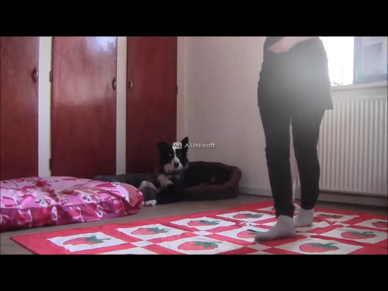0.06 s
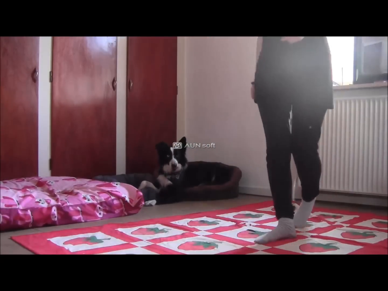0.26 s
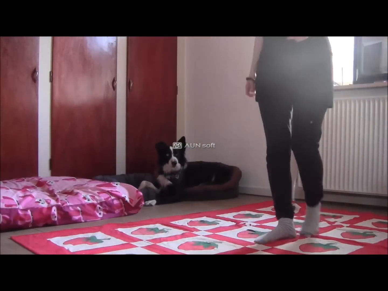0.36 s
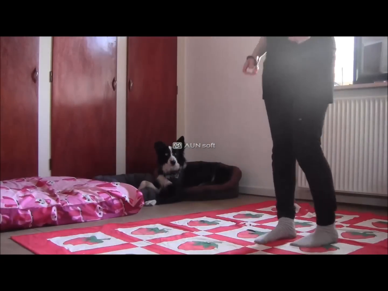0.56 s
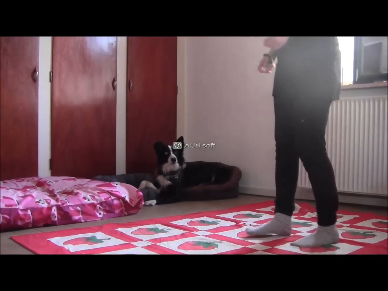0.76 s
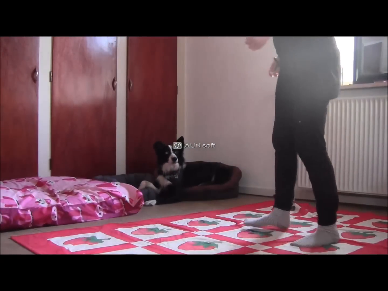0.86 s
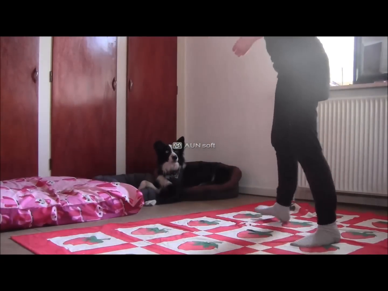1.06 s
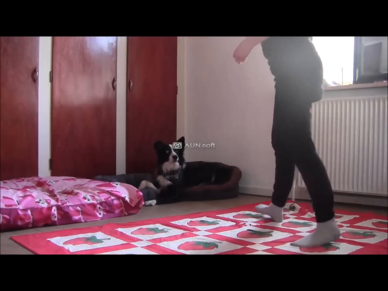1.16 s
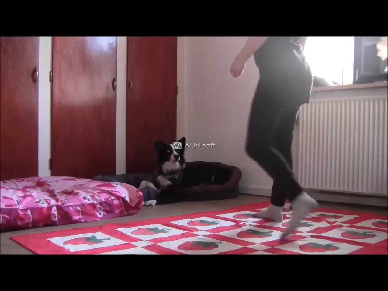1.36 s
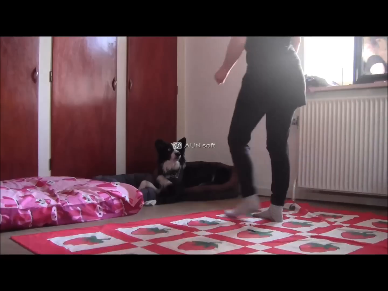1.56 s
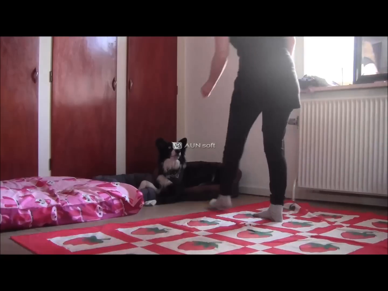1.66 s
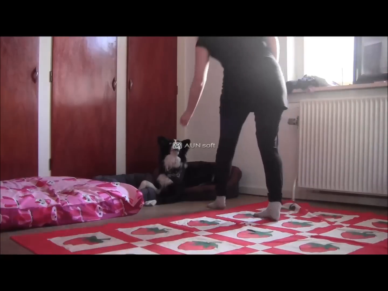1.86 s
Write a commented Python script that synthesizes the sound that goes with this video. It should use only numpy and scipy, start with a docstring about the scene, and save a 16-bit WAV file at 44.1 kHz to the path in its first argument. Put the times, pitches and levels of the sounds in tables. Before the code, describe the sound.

A dog training clicker snaps twice in quick succession, bright and then lower, echoing briefly in a small room. Soft steps in socks and one heel knock follow, with faint clothes rustle and quiet room noise.

```python
"""Dog clicker in a small room

A training clicker is pressed and let go: its steel tongue snaps twice, bright then lower.
The trainer steps about in socks on a play mat, clothes rustling; one heel knocks on the floor.
Hard, near walls throw strong echoes at a closely spaced microphone pair. A limiter holds the peaks,
and quiet room noise lies underneath."""
import sys
import numpy as np
from scipy import signal
from scipy.fft import rfft, irfft
from scipy.io import wavfile
from scipy.ndimage import uniform_filter1d, minimum_filter1d

SR = 44100
rng = np.random.default_rng(int(sys.argv[2]) if len(sys.argv) > 2 else 0)


def master_out(mix):
    """Clip the mix to full scale and print it as 16-bit PCM to the path in sys.argv[1]."""
    frames = np.transpose(np.atleast_2d(mix))
    ceiling = np.clip(frames, -1, 1)
    pcm = np.round(ceiling * 32767).astype(np.int16)
    wavfile.write(sys.argv[1], SR, pcm)


N = 83790
T = np.arange(N) / SR
HZ = np.fft.rfftfreq(2 * N, 1 / SR)

# stereo width of room noise and rustle: frequency_hz, side_to_mid_db
AMBIENT_WIDTH = [(80, -15.5), (210, -7.5), (420, -0.5), (900, 0), (1800, -3.5), (6500, -4.5), (12000, -1)]


def clicker():
    """The steel tongue snaps as it is bent, then rings lower as it springs back."""
    # levels of each snap: ring_db, crack_db, echo_db, tail_db, chatter_db
    press_levels = (24.5, -2, 5, 5, -3.5)
    release_levels = (28, -1.5, 2, 6, 8)
    # modes of the tongue, bent and free: pitch_hz, width_hz, level_db
    bent_modes = [(1250, 330, -21.5), (1805, 520, -5), (2330, 480, -7), (2920, 340, -2), (3473, 490, 1),
                  (4050, 290, -25.5), (6574, 760, -7.5), (9880, 4100, -21)]
    free_modes = [(1050, 480, -26), (1440, 600, -14), (1860, 303, 2.5), (2086, 337, -3), (2377, 600, -15.5),
                  (3730, 730, -20), (4180, 470, -19.5), (5894, 1600, -29), (8300, 1200, -34.5),
                  (9966, 500, -26.5)]
    press = snap(press_levels, bent_modes, start_s=.2279)
    release = snap(release_levels, free_modes, start_s=.3781)
    return press + release


def snap(levels, modes, start_s):
    """The tongue buckles with a crack; its modes swell in the case and die within milliseconds."""
    # spectrum of the crack: frequency_hz, level_db
    crack_spectrum = [(100, -34.5), (450, -24.5), (800, -12.5), (1500, 8.5), (4000, 3), (5300, -6),
                      (10500, -16), (13000, -17), (16000, -19.5)]
    # stereo width of the snap's reverberation: frequency_hz, side_to_mid_db
    snap_width = [(500, -15), (1000, -13), (2000, -17.5), (3500, -12.5), (7000, -8), (12000, -4)]
    ring_db, crack_db, echo_db, tail_db, chatter_db = levels
    tongue = sum((-1) ** k * amp(db) * band(hz, width) ** 2 for k, (hz, width, db) in enumerate(modes))
    case = high_pass(hz=605, order=2)  # the small case radiates little bass
    crack = pulse(crack_spectrum)
    source = amp(ring_db) * tongue * case + amp(crack_db) * crack
    # the tongue chatters for about 1 ms as it lands, beamed straight at the microphones
    chatter = rng.standard_normal(N) * np.exp(-T / .001)
    chatter = shape(chatter / np.linalg.norm(chatter), delay(start_s) * crack)
    return room(delay(start_s) * source, echo_db, tail_db, snap_width) + amp(chatter_db) * chatter


def feet(heel_s=1.3298):
    """One hard heel knock and several soft, scuffing footfalls ring the same floor."""
    # modes of the floor: pitch_hz, width_hz, level_db
    floor_modes = [(238, 30, 8), (289, 54, 0.5), (375, 78, -6.5), (513, 40, 5), (640.6, 12, -4.5),
                   (770, 70, -17.5), (918, 80, -15), (1150, 150, -11), (1560, 260, -11)]
    # contact noise of a foot: frequency_hz, level_db
    knock_spectrum = [(40, -6), (130, -3), (600, -5), (1400, -8.5), (2300, 6), (2900, 4), (3600, -5),
                      (4400, -31.5), (6200, -27), (10000, -47), (16000, -75)]
    # levels of the heel, then of the room for all steps: ring_db, knock_db, echo_db, tail_db
    levels = (11, -4.5, -3.5, 4)
    # soft footfalls: start_s, level_db, contact_s, scuff_db, treble_cut_hz
    footfalls = [(.03, -8.5, .012, -21, 260), (.56, -6.5, 0.0073, -26, 266), (.605, -6.5, 0.0093, -6, 1583),
                 (1.04, -9, .01, -31.5, 260), (1.482, -10.5, .003, -12, 1180),
                 (1.876, -18.5, 0.0082, -24, 800)]
    # stereo width of the steps' reverberation: frequency_hz, side_to_mid_db
    step_width = [(100, -21.5), (250, -29.5), (450, -22.5), (900, -17), (3500, -15), (7000, -4)]
    ring_db, knock_db, echo_db, tail_db = levels
    floor = ring(floor_modes) * low_pass(hz=2120, order=5)
    knock = pulse(knock_spectrum)
    steps = delay(heel_s) * (amp(ring_db) * floor + amp(knock_db) * knock)
    for start_s, level_db, contact_s, scuff_db, treble_cut_hz in footfalls:
        push = rng.standard_normal(N) * T * np.exp(-T / contact_s)
        soft_push = rfft(push / np.linalg.norm(push), 2 * N) * low_pass(treble_cut_hz, order=2)
        steps += delay(start_s) * amp(level_db) * soft_push * (floor + amp(scuff_db) * knock)
    return room(steps, echo_db, tail_db, step_width)


def clothes():
    """Clothes and socks rub: a swish of noise swells and fades with each move."""
    # swishes: peak_s, half_length_s, level_db
    swishes = [(.02, 0.026, -60), (0.135, 0.12, -59.5), (0.595, 0.15, -55), (0.854, 0.12, -62.5),
               (1.204, 0.045, -65.5), (1.366, 0.058, -58.5), (1.46, 0.052, -61.5), (1.89, 0.057, -73)]
    # colour of rubbing cloth: frequency_hz, relative_db
    cloth_spectrum = [(100, -6.5), (500, 11.5), (1200, 4.5), (3000, 5.5), (6000, 0.5), (9500, -7),
                      (13000, -24), (16000, -34)]
    movement = sum(amp(db) * np.exp(-2 * ((T - peak_s) / half_s) ** 2) for peak_s, half_s, db in swishes)
    return noise(cloth_spectrum) * movement


def bumps():
    """Faint, deep bumps sound under the clicks."""
    # low bumps: start_s, relative_db
    hits = [(.236, 3.5), (0.32, 0), (0.373, -3)]
    impulses = sum(amp(db) * delay(start_s) for start_s, db in hits)
    return amp(9.5) * irfft(band(hz=60, width_hz=70) ** 2 * impulses)[:N]


def room(source, echo_db, tail_db, stereo_width, build_s=.0064):
    """A source spectrum reaches the pair as direct sound, echoes and a tail longest in the midrange."""
    # reverberation time: frequency_hz, t60_s
    decay_times = [(100, 0.17), (300, 0.19), (800, 0.56), (1900, .49), (3500, 0.42), (7000, 0.28),
                   (11000, 0.3), (15000, 0.095)]
    wash = rfft(diffuse(stereo_width), 2 * N)
    tail = 0
    for centre_hz, t60_s in decay_times:
        share = curve([(hz, hz == centre_hz) for hz, _ in decay_times])  # crossfades between bands
        tail += irfft(wash * share)[:, :N] * np.exp(-np.log(1000) * T / t60_s)
    tail = tail * (1 - np.exp(-T / build_s)) / np.sqrt(SR * .033)
    response = 1 + amp(echo_db) * echoes(stereo_width) + amp(tail_db) * rfft(tail, 2 * N)
    return irfft(source * response)[:, :N]


def echoes(stereo_width, scatter_s=.0009, scatter_db=.5):
    """Each near reflection is part mirrored, part smeared by furniture, and loses some treble."""
    # reflections off floor, ceiling and walls: delay_s, relative_db
    reflections = [(.0045, -3), (.0068, -11.5), (.0101, 0.5), (0.0108, -2.5), (0.0156, 0), (0.0133, -9.5)]
    mirrored = sum(amp(db) * delay(delay_s) for delay_s, db in reflections)
    burst_power = sum(amp(db) ** 2 * (T >= delay_s) * np.exp(-2 * np.abs(T - delay_s) / scatter_s)
                      for delay_s, db in reflections)
    scattered = diffuse(stereo_width) * np.sqrt(burst_power * 2 / (SR * scatter_s))
    return (.55 * mirrored + amp(scatter_db) * rfft(scattered, 2 * N)) * low_pass(hz=9000, order=1)


def room_tone(noise_db=-59.5):
    """Quiet, steady noise keeps a few room resonances droning."""
    # colour of the room noise: frequency_hz, relative_db
    air_spectrum = [(20, -25), (45, -10), (75, -13.5), (125, -9.5), (160, -17.5), (290, -7), (400, -15.5),
                    (600, -12.5), (800, -18), (1200, -18.5), (3000, -25), (6000, -32), (10000, -37.5),
                    (16000, -45.5)]
    # room resonances: pitch_hz, width_hz, level_db
    resonances = [(89, 62, -62), (196.6, 8.6, -66.5), (526, 65, -69.5)]
    tone = amp(noise_db) * noise(air_spectrum)
    for pitch_hz, width_hz, level_db in resonances:
        drone = shape(diffuse(AMBIENT_WIDTH), band(pitch_hz, width_hz) ** 2)
        tone += amp(level_db) * drone / drone.std()
    return tone


def diffuse(stereo_width):
    """Noise from all sides, as two closely spaced microphones hear it."""
    mid, side = rng.standard_normal((2, N))
    return mid + shape(side, amp(curve(stereo_width))) * np.array([[1], [-1]])


def noise(spectrum):
    """Diffuse noise of a given colour, rms 1."""
    coloured = shape(diffuse(AMBIENT_WIDTH), amp(curve(spectrum)))
    return coloured / coloured.std()


def pulse(spectrum):
    """Response of the shortest causal pulse with this spectrum."""
    cepstrum = irfft(np.log(amp(curve(spectrum))))[:N]
    return np.exp(rfft(2 * cepstrum, 2 * N) - cepstrum[0])


def ring(modes):
    """Response of a struck body: a sum of damped modes."""
    return sum(amp(db) * band(hz, width_hz) for hz, width_hz, db in modes)


def band(hz, width_hz):
    """Response of one resonance, gain 1 at its centre."""
    return 1j * HZ * width_hz / (hz * hz - HZ ** 2 + 1j * HZ * width_hz)


def high_pass(hz, order):
    """Response of a smooth low cut."""
    return signal.freqs(*signal.butter(order, 1, "high", analog=True), HZ / hz)[1]


def low_pass(hz, order):
    """Response of a smooth treble cut."""
    return signal.freqs(*signal.butter(order, 1, analog=True), HZ / hz)[1]


def delay(seconds):
    """Response of a delay."""
    return np.exp(-2j * np.pi * HZ * seconds)


def shape(sound, response):
    """Filter a sound with a frequency response."""
    return irfft(rfft(sound, 2 * N) * response)[..., :N]


def curve(points):
    """Rows of frequency_hz, value joined on a log-frequency axis."""
    hz, values = np.array(points, float).T
    return np.interp(np.log(HZ + 1), np.log(hz), values)


def amp(db):
    """Decibels to gain."""
    return 10 ** (np.asarray(db) / 20)


def scene():
    """Clicker, feet and clothes through the microphones' treble roll-off, over bumps and room tone."""
    action = clicker() + feet() + clothes()
    return shape(action, low_pass(hz=11300, order=8)) + bumps() + room_tone()


def record(dry, ceiling=.68, reach_s=.0006, top_hz=16200):
    """The recorder's fast limiter holds down the loudest peaks; a steep filter cuts the top."""
    window = int(reach_s * SR) * 2 + 1
    gain = ceiling / np.maximum(np.abs(dry).max(axis=0), ceiling)
    smooth_gain = uniform_filter1d(minimum_filter1d(gain, window), window)
    top_cut = signal.ellip(8, .2, 70, top_hz, fs=SR, output="sos")
    return signal.sosfilt(top_cut, dry * smooth_gain)


dry = scene()
out = record(dry)
master_out(out)
```